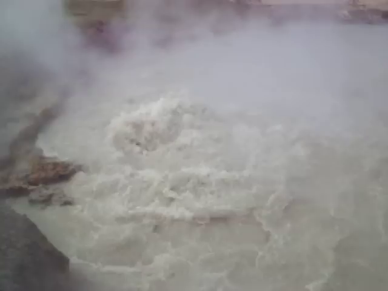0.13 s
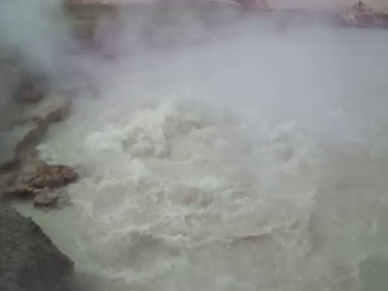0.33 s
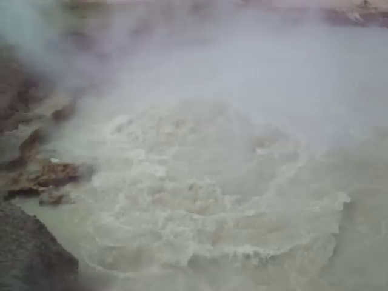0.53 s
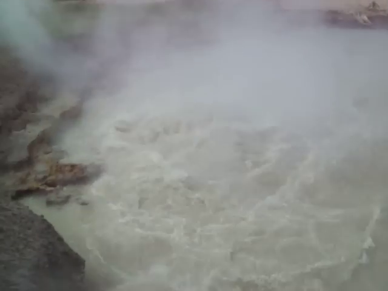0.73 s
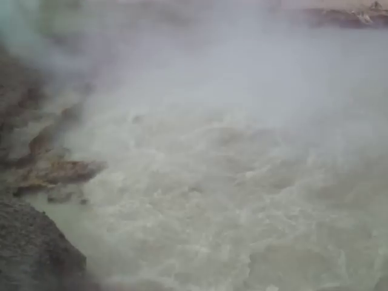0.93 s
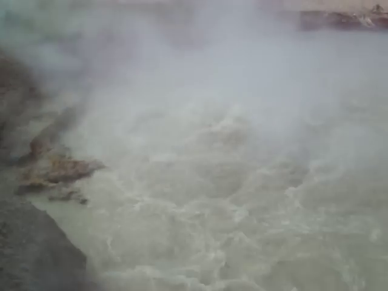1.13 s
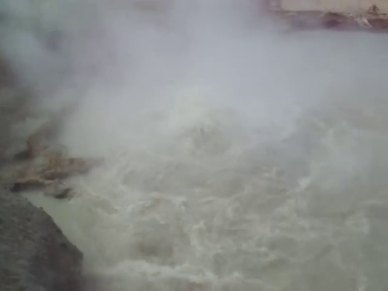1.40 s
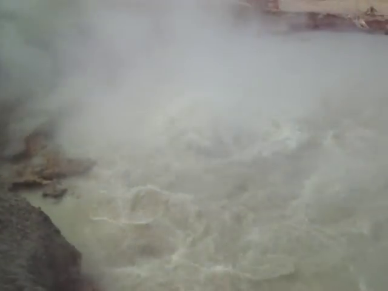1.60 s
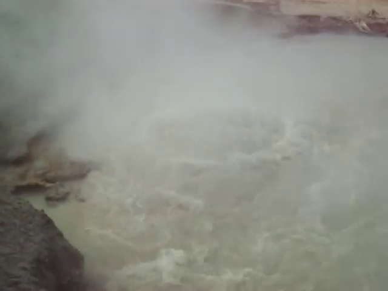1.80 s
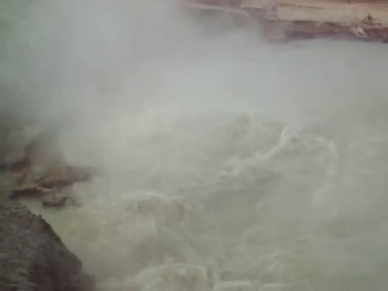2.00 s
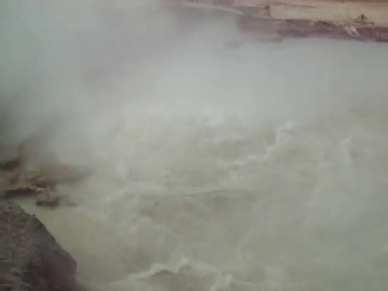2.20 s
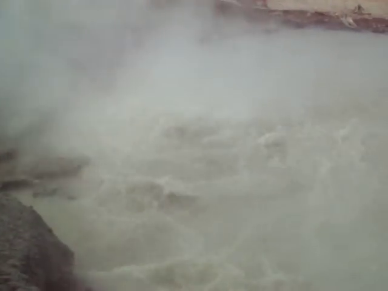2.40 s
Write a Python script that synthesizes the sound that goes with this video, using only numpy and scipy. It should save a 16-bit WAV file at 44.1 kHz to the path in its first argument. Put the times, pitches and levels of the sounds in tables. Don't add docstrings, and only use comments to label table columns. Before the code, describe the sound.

Outdoors beside a boiling mud pool, heavy wind buffeting overloads a cheap close microphone with low rumble and crackly knocks; steady steam rush and hollow bubbling show through, especially in the calmer middle.

```python
import sys
import numpy as np
from scipy import signal
from scipy.io import wavfile
from scipy.ndimage import uniform_filter1d

SR = 44100
rng = np.random.default_rng(int(sys.argv[2]) if len(sys.argv) > 2 else 0)


def makeup_ratio(level_db):
    decades = np.asarray(level_db, float) / 20
    return 10 ** decades


def to_wav(s):
    ch = np.atleast_2d(s).T
    pcm = np.round(np.clip(ch, -1, 1) * 32767)
    wavfile.write(sys.argv[1], SR, pcm.astype(np.int16))


N = 112896

# pitch_hz [Hz], level_db [dB per Hz]
STEAM_COLOUR = [(150, 6.5), (400, -17), (900, -13.5), (1650, -26.5), (2200, -17), (3600, -18.5),
                (5000, -16), (6000, -8.5)]
# pitch_hz [Hz], width_hz [Hz], gain_db [dB]
HOLLOWS = [(615.6, 164, 20.5), (1267, 56, 10.5), (2590, 580, 9)]
# time_s [s], level_db [dB]
BOIL = [(0.04, -0.5), (0.2, 1), (0.35, -0.5), (0.5, -4.5), (0.7, 3.5), (0.9, -3.5), (1.05, 2.5), (1.2, 3.5),
        (1.35, -3.5), (1.5, -2.5), (1.65, -1.5), (1.8, -2), (1.95, 4.5), (2.1, 1), (2.3, 4.5), (2.56, 1.5)]
# time_s [s], turbulence_db [dB], slow_pressure_db [dB]
WIND = [(0.04, 3.5, 13), (0.301, 14, 6.5), (0.42, 15.5, 8.5), (0.5, 17, 15), (0.56, 25, 21.5),
        (0.679, 24, 13.5), (0.717, -4.5, 14), (0.78, 26.5, 22.5), (0.902, 28.5, 23.5), (0.941, 3.5, 12.5),
        (1.199, 10.5, 13.5), (1.5, 1.5, 8.5), (1.661, 7.5, 12.5), (1.8, -1.5, 6), (1.96, 10, 18.5),
        (2.2, 17.5, 14), (2.421, 17.5, 20), (2.56, 21, 25.5)]
# pitch_hz [Hz], level_db [dB per Hz]
TURBULENCE_COLOUR = [(40, -7), (120, 2), (260, 3), (500, -26.5), (1000, -32.5), (2000, -53)]
# time_s [s], pitch_hz [Hz], level_db [dB over turbulence]
SHEDDING = [(0.04, 150, 0), (0.2, 190, 2.5), (0.351, 220, -6), (0.502, 260, -2.5), (0.652, 300, -7.5),
            (0.801, 240, -2.5), (0.95, 220, -9), (1.301, 200, -11.5), (1.501, 290, -12), (1.701, 250, -1.5),
            (1.901, 200, -4.5), (2.2, 220, -13.5), (2.56, 200, -12)]
# centre_s [s], excess_db [dB], width_ms [ms]
PUSHES = [(0.1188, 9, 3.8), (0.1759, 6.5, 1.4), (0.1856, 13.5, 2.3), (0.2331, 9, 2.1), (0.2511, -1, 1.8),
          (0.2985, 2, 1.5), (0.3083, -0.5, 1.7), (0.3147, 8, 1.4), (0.3491, -2, 1.8), (0.382, 6, 1.6),
          (0.417, -2, 1.9), (0.5158, 5.5, 1.2), (0.5412, 10.5, 0.75), (0.6201, 4, 0.9),
          (0.6867, 10.5, 1.25), (0.7178, 2, 1.0), (0.743, 6, 1.6), (0.7596, 6, 1.2), (0.8132, 3, 0.86),
          (0.8315, 2, 0.64), (0.8458, 2, 1.1), (0.8908, -6, 0.93), (0.8979, 5, 1.4), (1.1344, 2.5, 2.1),
          (1.1658, -0.5, 0.73), (1.2153, 0.5, 0.61), (1.2496, 1.5, 0.68), (1.4023, -2.5, 2.8),
          (1.551, 10.5, 2.0), (1.6108, 0, 0.71), (1.638, 3, 4), (1.6796, 8.5, 0.78), (1.7318, 5.5, 5.6),
          (1.775, -2, 2.1), (1.7823, 5, 0.74), (1.819, 8.5, 1.8), (1.8535, 3.5, 1.8), (1.9028, 11, 3.3),
          (1.9243, 8, 4), (1.9686, 2.5, 0.88), (2.0787, 1.5, 1.7), (2.129, 8, 0.72), (2.1624, 10.5, 1.3),
          (2.27, 5.6, 0.72), (2.285, -6, 1.1), (2.3344, 2.5, 1.9), (2.3846, 0, 2.8), (2.4257, 5.5, 1.1),
          (2.4568, -5, 2.7), (2.4864, 6, 1.3), (2.5026, 9, 1.46), (2.522, 3.5, 1.7)]
# centre_s [s], excess_db [dB], width_ms [ms]
SUCTIONS = [(0.08, 5, 2.5), (0.1123, 5, 0.95), (0.1443, 12.5, 1.4), (0.2679, 9, 2.9), (0.2787, 3.5, 2.5),
            (0.3325, 3.5, 1.6), (0.3651, -8, 0.63), (0.4013, 7.5, 1.7), (0.4332, 3.5, 1.3),
            (0.4444, 5, 1.5), (0.4629, 9, 0.58), (0.528, 4.5, 1.1), (0.5711, 8.8, 1.1), (0.607, 3, 1.05),
            (0.6319, 6, 0.62), (0.654, 9, 0.45), (0.6888, 4, 0.9), (0.732, 2.5, 1.1), (0.7734, 6, 0.91),
            (0.7903, 3.5, 1), (0.821, 0, 2), (0.8423, -0.5, 0.74), (0.851, 8, 2.1), (0.974, -15, 1.5),
            (1.0842, 5.1, 1.6), (1.1164, 6.0, 1.6), (1.1458, 6.5, 1.4), (1.2635, 8, 3), (1.298, 2, 0.77),
            (1.3379, 2, 1.5), (1.3754, 4.5, 3.3), (1.443, 8.5, 2.3), (1.6508, 5, 2.4), (1.7153, 7, 1.3),
            (1.7432, 1, 2.5), (1.8057, 7.5, 1.8), (1.8298, 12, 2.9), (1.918, 8.5, 3.8), (1.981, 5, 2.7),
            (2.0074, 2.5, 3.4), (2.0325, 2, 2.8), (2.0402, 8.5, 2.1), (2.0964, 8.5, 2.2), (2.1922, 3, 2.2),
            (2.1982, 10, 1.45), (2.2449, 10, 1.3), (2.3037, 5.5, 3), (2.3494, 5.5, 1.5),
            (2.3948, 4.5, 1.25), (2.402, 7.5, 1.2), (2.4657, -4, 1.2), (2.4774, 5.5, 2.4)]
# centre_s [s], peak_db [dB]
SNAPS = [(0.355, -15), (0.378, -16), (0.413, -15), (0.431, -20), (0.547, -14.5), (0.554, -6), (0.561, -12),
         (0.569, -16.5), (0.594, -21), (0.6, -17), (0.611, -24), (0.63, -21), (0.63, -19), (0.643, -16),
         (0.65, -13.5), (0.655, -5.5), (0.685, -15.5), (0.772, -19.5), (0.79, -25), (0.809, -18),
         (0.812, -19), (0.832, -25), (0.837, -16), (0.844, -8), (0.849, -21), (0.876, -13), (0.883, -21),
         (0.916, -21), (2.191, -17.5), (2.244, -19.5), (2.484, -20), (2.52, -25), (2.552, -17.5)]
OVERFLOWS = [
    0.18594,
    0.18630,
    0.18649,
    2.12889,
    2.16172,
]

POOL_DB, GURGLE_DB, GURGLES_PER_S = 8, 0.5, 410
RUMBLE_DB, TURBULENCE_DB = 1.5, -2.5
EDDY_DB, EDDIES_PER_S = -7, 130
FLUTTER_DB, FLUTTERS_PER_S = -15, 350
FLUTTER_GROWTH = 0.25
SHEDDING_WIDTH_HZ = 49
CALM_TOP_DB = 3.5
BUFFET_DB, NARROWEST_MS = 4, 0.85
SKIRT_SHARE, SKIRT_WIDTHS = 0.48, 2.7
SNAP_DB, SNAP_MS = 11, 1.15
START_S, FIRST_PUSH_S, FIRST_PUSH_DB = 0.03628, 0.0014, 7.5
HOLD_DB, ATTACK_MS, RELEASE_DB_PER_S = -10, 1.46, 430
SQUEEZE = 0.97
TOP, OUTER_TOP = 0.685, 0.715


def rms_one(x):
    return x / np.sqrt(np.mean(x ** 2) + 1e-20)


def even_out(x, size):
    return x / np.sqrt(uniform_filter1d(x ** 2, size=size) + 1e-12)


def band_pass(x, order, low_hz, high_hz):
    return signal.sosfilt(signal.butter(order, [low_hz, high_hz], "band", fs=SR, output="sos"), x)


def low_pass(x, high_hz):
    return signal.sosfilt(signal.butter(2, high_hz, fs=SR, output="sos"), x)


def follow(table):
    times, *columns = np.transpose(table)
    return [np.interp(np.arange(N) / SR, times, column) for column in columns]


def drift(rate):
    r = np.exp(-80 * np.pi * rate / SR)
    noise = rng.standard_normal(N // 40 + 2002)
    slow = signal.lfilter([1], [1, -2 * r, r * r], noise)[2000:]
    return np.interp(np.arange(N) / 40, np.arange(len(slow)), rms_one(slow))


def banded_noise(spectrum, shared_db, own_db, rate):
    hz, level_db = np.transpose(spectrum)
    edges = hz[0] / 1.3 * 2 ** np.arange(0, np.log2(1.6 * hz[-1] / hz[0]), 1 / 3)
    together = drift(rate)
    white = rng.standard_normal((2, N))
    out = 0
    for k, (low, high) in enumerate(zip(edges, edges[1:])):
        band = band_pass(white[k % 2], 2, low, high)
        gain_db = np.interp(np.log(low * high) / 2, np.log(hz), level_db)
        out = out + band * makeup_ratio(gain_db + shared_db * together + own_db * drift(rate))
    return rms_one(out)


def grains(rate, spread_db):
    sizes = makeup_ratio(spread_db * np.minimum(rng.exponential(1, N), 4)) * rng.choice([-1, 1], N)
    return sizes * (rng.random(N) < rate / SR)


def steam_rush():
    rush = banded_noise(STEAM_COLOUR, shared_db=0.64, own_db=1.5, rate=41)
    for hz, width_hz, gain_db in HOLLOWS:
        r = np.exp(-np.pi * width_hz / SR)
        ringing = [1, -2 * r * np.cos(2 * np.pi * hz / SR), r * r]
        peak = signal.lfilter([(1 - r * r) / 2, 0, (r * r - 1) / 2], ringing, rush)
        rush = rush + (makeup_ratio(gain_db) - 1) * peak
    return rms_one(rush)


def mud_gurgles():
    clicks = grains(GURGLES_PER_S, spread_db=1.0)
    dealt = rng.integers(0, 16, N)
    gurgle = 0
    for k, hz in enumerate(np.geomspace(430, 950, num=16)):
        r = makeup_ratio(-60 * hz / (12.0 * SR))
        w = 2 * np.pi * hz / SR
        bubbles = clicks * (dealt == k) + 1e-18
        gurgle = gurgle + signal.lfilter([0, np.sin(w)], [1, -2 * r * np.cos(w), r * r], bubbles)
    return rms_one(low_pass(gurgle, 1100))


def pool():
    boil_db, = follow(BOIL)
    return makeup_ratio(POOL_DB) * steam_rush() + makeup_ratio(GURGLE_DB + boil_db) * mud_gurgles()


def wind():
    t = np.arange(N) / SR
    gust_db, slow_db = follow(WIND)
    gust, slow = makeup_ratio(gust_db), makeup_ratio(slow_db)
    out = slow * rumble() + gust * turbulence()
    out = out + gust * flutter(gust_db)
    out = out + gust * shedding(t)
    around = np.sqrt(gust ** 2 + slow ** 2 + makeup_ratio(2 * POOL_DB))
    ceiling = around * makeup_ratio(CALM_TOP_DB)
    out = ceiling * np.tanh(out / ceiling)
    return buffets(out, around, t) + around * snaps()


def rumble():
    low = band_pass(rng.standard_normal(N + SR), 2, 18, 75)[SR:]
    return makeup_ratio(RUMBLE_DB) * rms_one(even_out(low, 3500))


def turbulence():
    lumps = even_out(banded_noise(TURBULENCE_COLOUR, shared_db=5.0, own_db=2.5, rate=22), 4000)
    eddies = band_pass(grains(EDDIES_PER_S, spread_db=-0.5) + 1e-18, 3, 70, 380)
    return makeup_ratio(TURBULENCE_DB) * lumps + makeup_ratio(EDDY_DB) * rms_one(eddies)


def flutter(gust_db):
    knocks = band_pass(grains(FLUTTERS_PER_S, spread_db=1.5) + 1e-18, 2, 280, 900)
    return makeup_ratio(FLUTTER_DB + FLUTTER_GROWTH * (gust_db - 16.5)) * rms_one(knocks)


def shedding(t):
    pitch_hz, level_db = follow(SHEDDING)
    phase = 2 * np.pi * np.cumsum(pitch_hz) / SR
    band = drift(SHEDDING_WIDTH_HZ) * np.cos(phase) + drift(SHEDDING_WIDTH_HZ) * np.sin(phase)
    return makeup_ratio(level_db) * band


def buffets(out, around, t):
    push = np.exp(-0.5 * ((t - START_S) / FIRST_PUSH_S) ** 2)
    out = out * (1 - push) + push * around * makeup_ratio(FIRST_PUSH_DB)
    for sign, table in [(1, PUSHES), (-1, SUCTIONS)]:
        for centre_s, excess_db, width_ms in table:
            i = slice(int(centre_s * SR) - 400, int(centre_s * SR) + 400)
            off = (t[i] - centre_s) / (max(width_ms, NARROWEST_MS) * 0.00025)
            core = np.exp(-0.5 * off ** 2)
            skirt = np.exp(-0.5 * (off / SKIRT_WIDTHS) ** 2)
            bump = (1 - SKIRT_SHARE) * core + SKIRT_SHARE * skirt
            peak = sign * around[i] * makeup_ratio(BUFFET_DB + excess_db)
            out[i] = out[i] * (1 - bump) + bump * peak
    return out


def snaps():
    strength = np.zeros(N)
    for centre_s, peak_db in SNAPS:
        strength[int(centre_s * SR)] = makeup_ratio(peak_db + SNAP_DB)
    length = SNAP_MS * SR / 1000
    shape = 2 * length * signal.filtfilt([1 / length], [1, -np.exp(-1 / length)], strength + 1e-18)
    noise = rms_one(band_pass(rng.standard_normal(N), 2, 300, 1200))
    return low_pass(shape * even_out(noise, 120), 1500)


def scene():
    return (pool() + wind())[None, :]


def gain_control(x, t):
    level_db = 20 * np.log10(np.abs(x) + 1e-3)
    held_db = np.maximum.accumulate(level_db + RELEASE_DB_PER_S * t) - RELEASE_DB_PER_S * t
    r = np.exp(-1000 / (ATTACK_MS * SR))
    held_db = signal.lfilter([1 - r], [1, -r], held_db)
    return x * makeup_ratio(HOLD_DB - SQUEEZE * held_db)


def converter(x, t):
    x = np.clip(x, -TOP, TOP)
    x = signal.filtfilt(signal.firwin(41, 5900, fs=SR), 1, x)
    for time_s in OVERFLOWS:
        x = np.maximum(x, TOP * (1.1 - np.abs(t - time_s) / 0.0006))
    x = np.minimum(x, TOP)
    ticks = np.zeros(N)
    ticks[np.round(np.array(OVERFLOWS) * SR).astype(int)] = -8 * TOP
    x = 4 * x * (np.arange(N) % 4 == 0)
    narrow = signal.firwin(135, 5512, window=("kaiser", 11), fs=SR)
    x = np.convolve(np.r_[x + ticks, x[-80:]], narrow, "same")[:N]
    return np.clip(x, -OUTER_TOP, OUTER_TOP)


def roll_off(x):
    return signal.sosfilt(signal.butter(12, 16900, fs=SR, output="sos"), x)


def record(dry):
    t = np.arange(N) / SR
    x = converter(gain_control(dry[0], t), t)
    x = x * (t > START_S)
    return roll_off(x[None, :])


dry = scene()
out = record(dry)
to_wav(out)
```